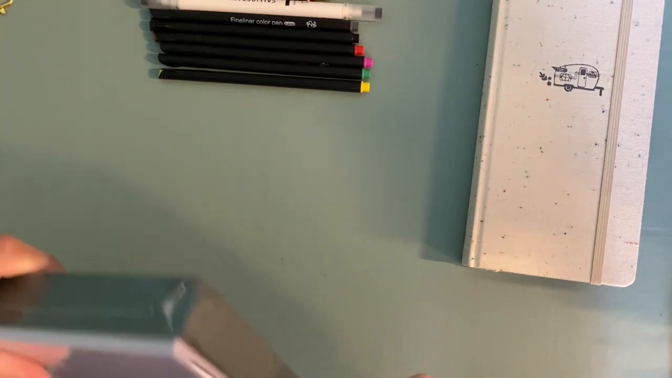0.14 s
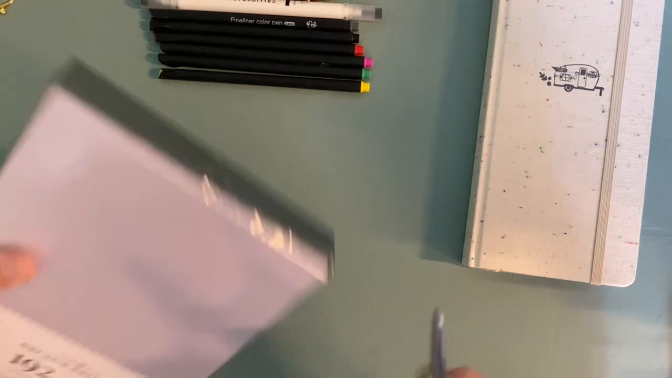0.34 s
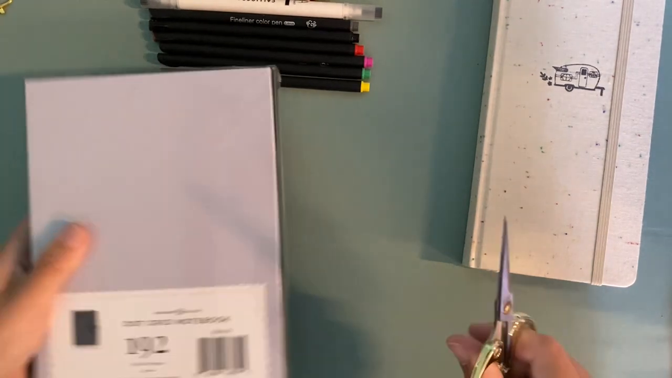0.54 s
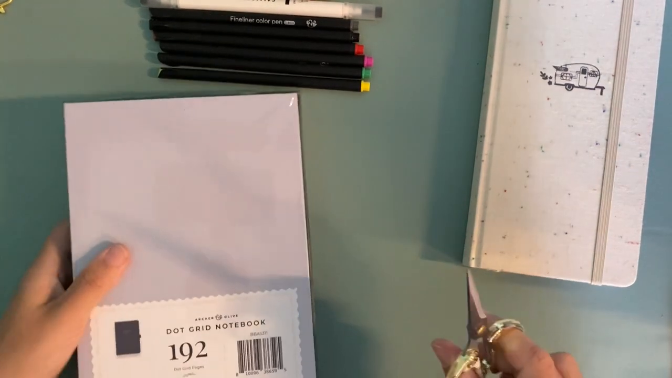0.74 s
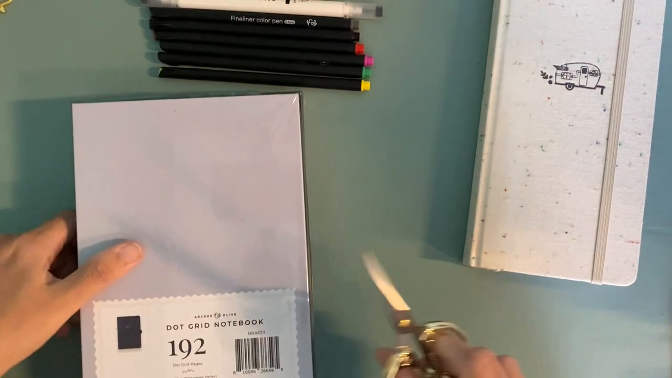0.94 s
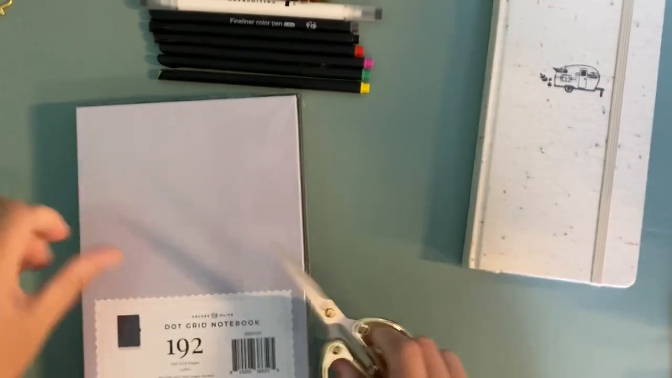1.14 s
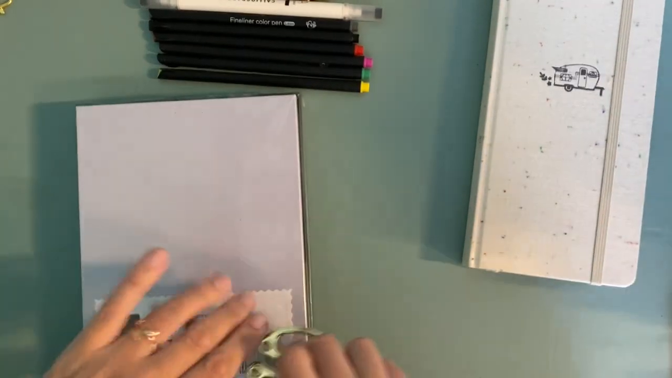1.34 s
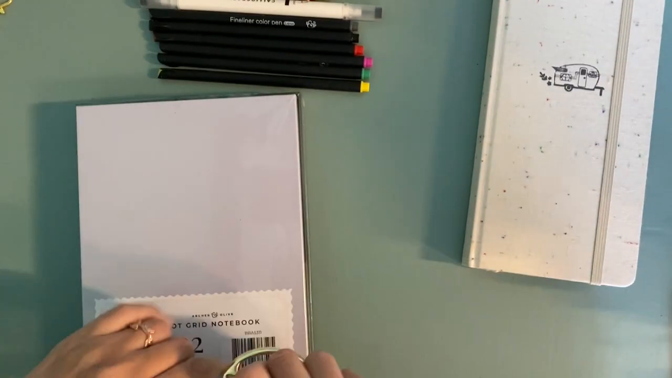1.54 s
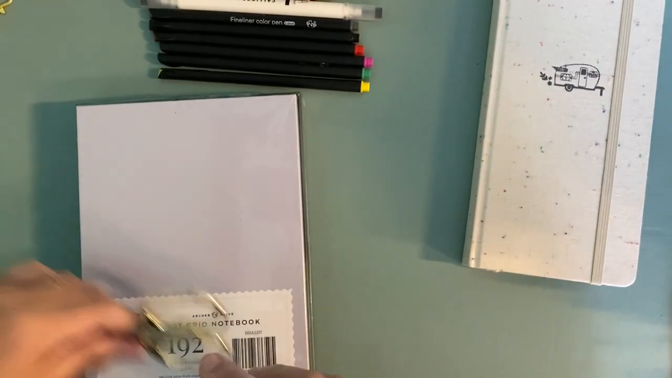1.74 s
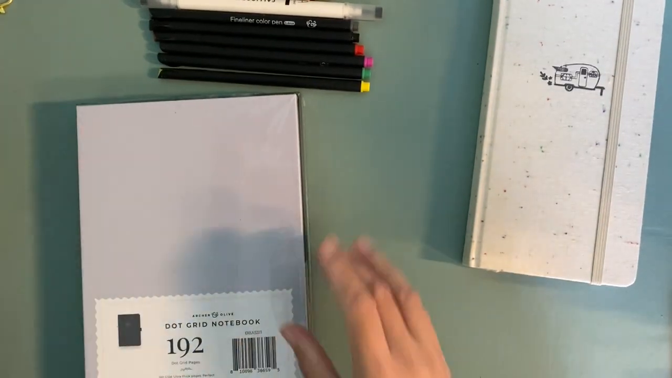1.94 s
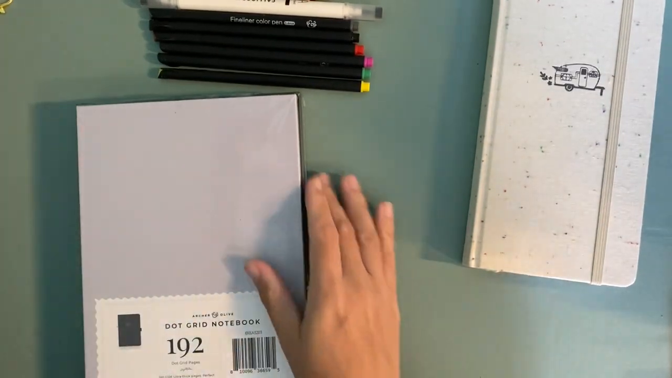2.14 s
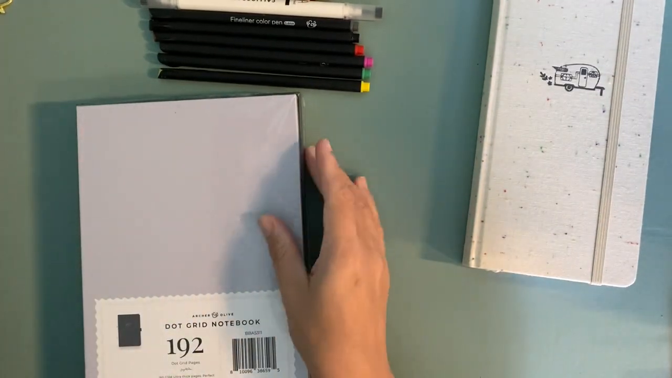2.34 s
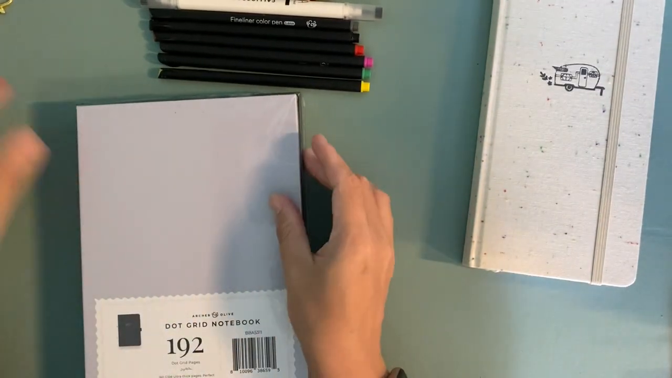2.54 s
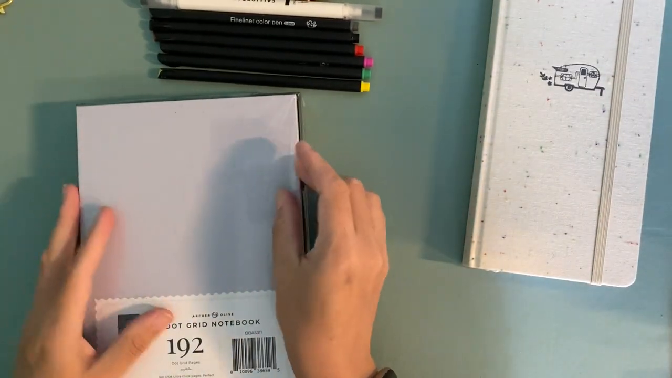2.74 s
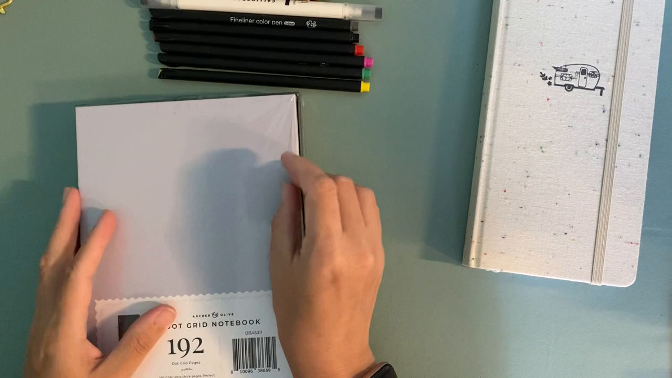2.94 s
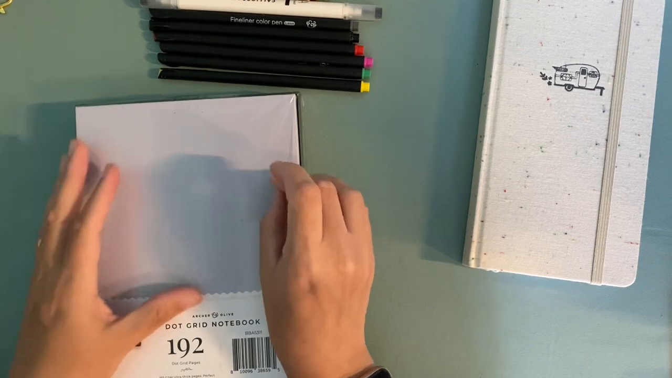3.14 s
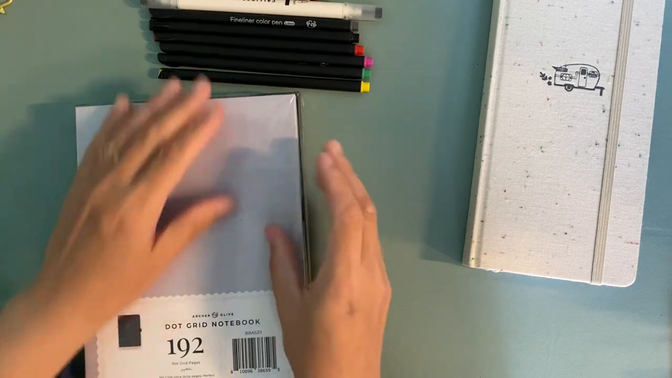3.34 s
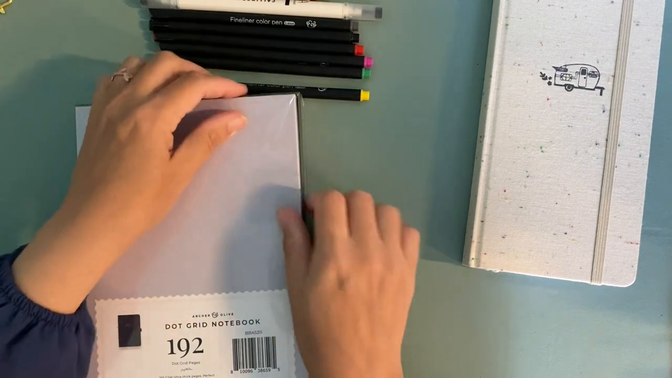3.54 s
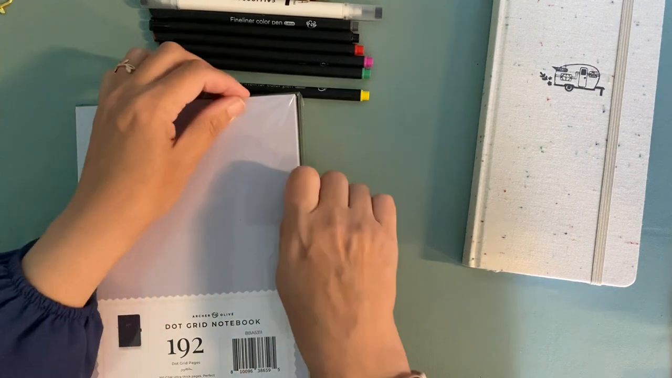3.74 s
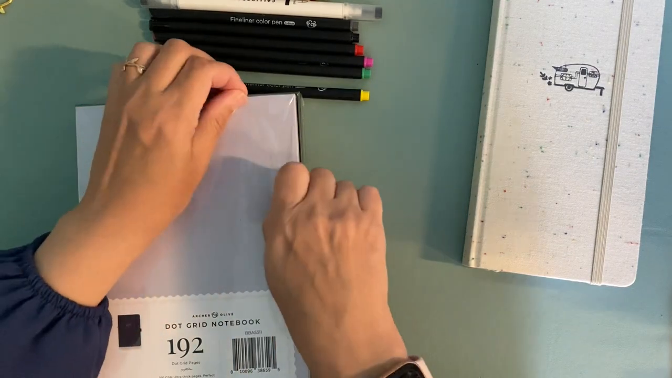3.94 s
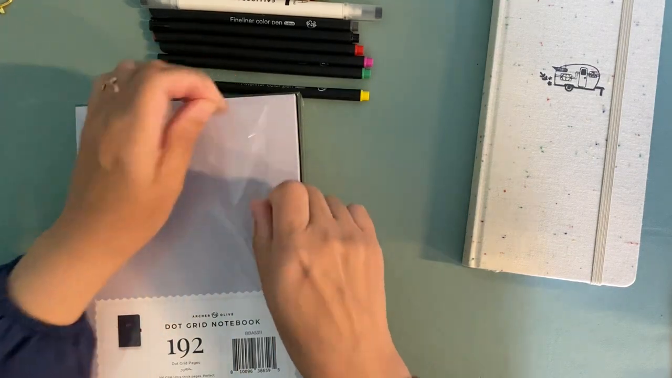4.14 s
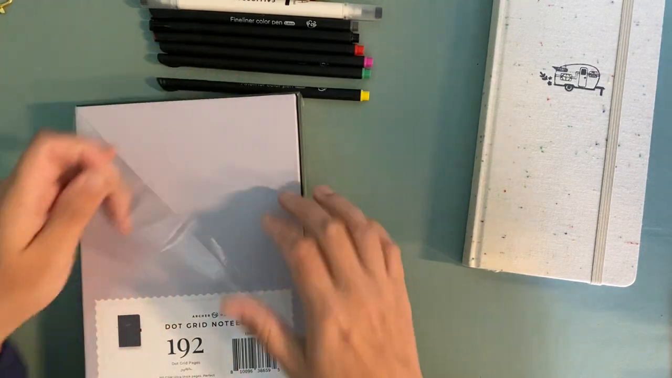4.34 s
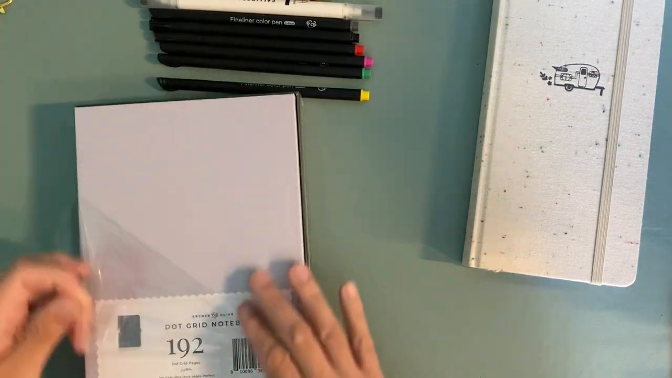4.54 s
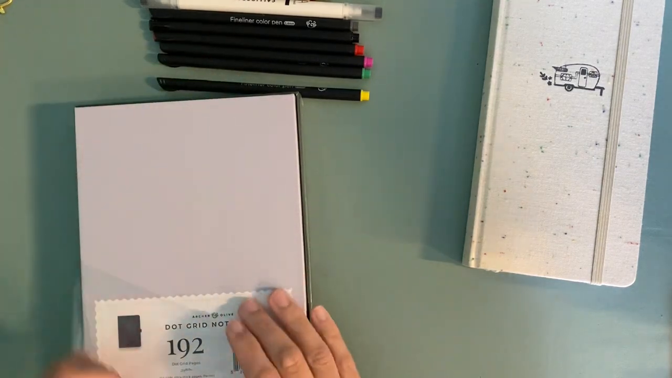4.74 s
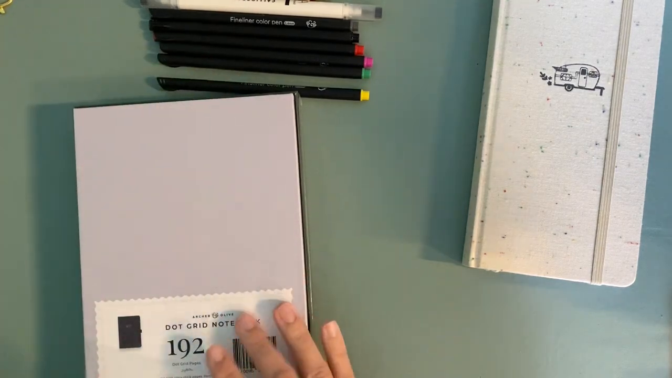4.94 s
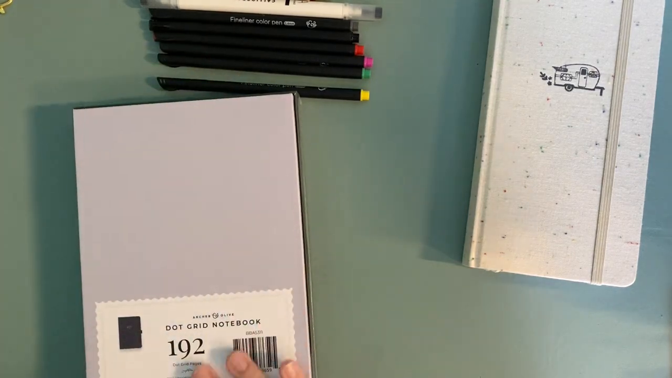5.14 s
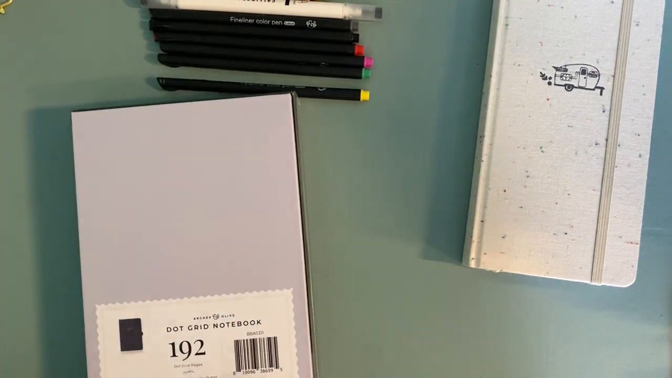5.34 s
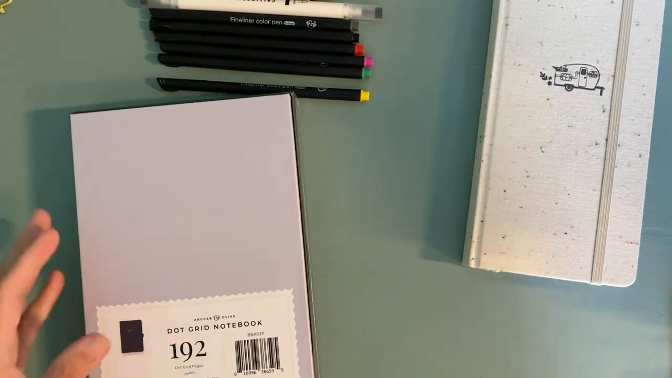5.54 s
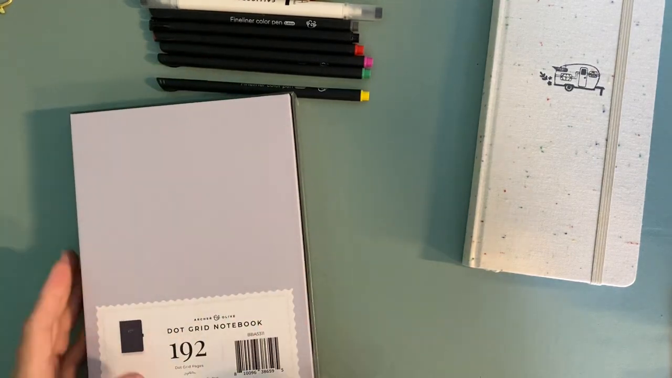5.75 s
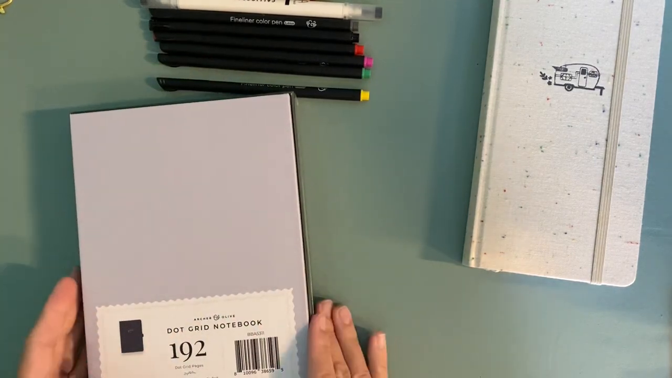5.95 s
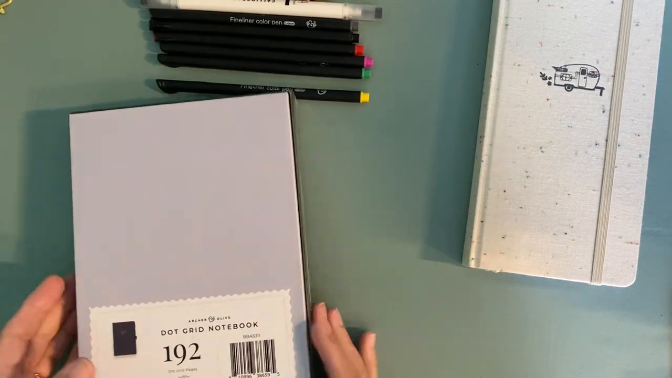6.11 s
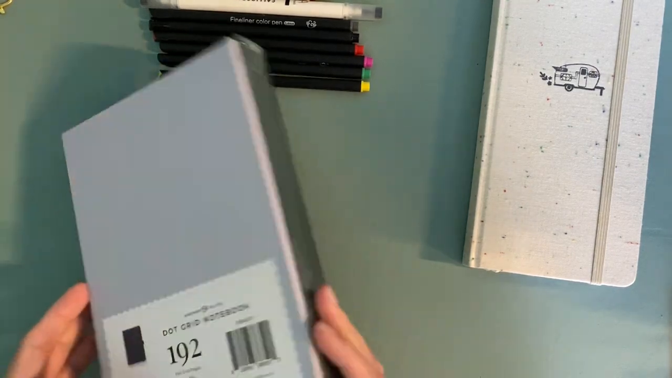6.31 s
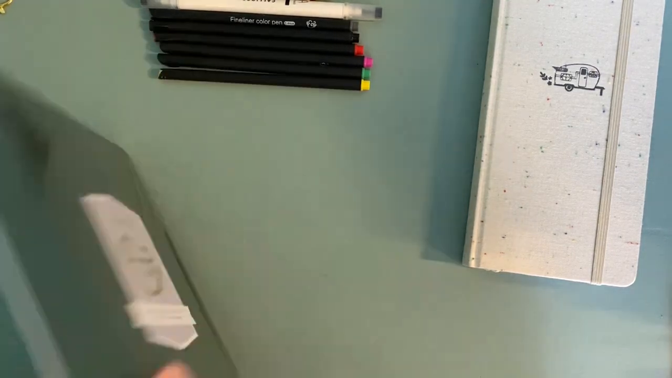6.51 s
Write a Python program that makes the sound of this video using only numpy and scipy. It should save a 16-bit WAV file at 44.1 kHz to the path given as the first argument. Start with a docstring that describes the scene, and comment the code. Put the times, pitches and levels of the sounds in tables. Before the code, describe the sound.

A wrapped hardcover book thuds softly onto a desk, scissors clatter down with ringing steel, then plastic film crackles sharply as it is peeled off.

```python
"""A shrink-wrapped hardcover notebook is laid on a desk: its landings ring the desk top and slap the air.
Its slit film is picked at and peeled off: creases snap and ring small patches, strokes hiss and crackle.
Scissors are put down beside it in a double clatter of knocks, clinks and ringing steel; pens rattle briefly.
At the end fingers slide over the book and lift it. The microphone's stand sways and trembles with the desk,
and the quiet room adds air noise and the narrow hum of ventilation."""
import sys
import numpy as np
from scipy import signal
from scipy.fft import rfft, irfft
from scipy.io import wavfile

SR = 44100
rng = np.random.default_rng(int(sys.argv[2]) if len(sys.argv) > 2 else 0)


def output_pcm(signal):
    """Save a mono or channel-first signal as 16-bit PCM at the path in sys.argv[1].

    Samples are clipped to [-1, 1] before scaling.
    """
    pcm = np.clip(np.atleast_2d(signal).T, -1, 1) * 32767
    wavfile.write(sys.argv[1], SR, np.round(pcm).astype(np.int16))


N = 290045
TIME = np.arange(N) / SR  # s

# colour of snapping film: (frequency [Hz], density [dB per Hz])
FILM_COLOUR = [(350, -32), (850, 4), (1300, -5), (1800, -4), (3000, -7.5), (4600, -1.5), (6900, -5),
               (8600, -2), (11000, -9), (13200, -7), (16000, -18)]
SNAP_T60 = 0.018  # s, decay of a snap's tick


def amp(db):
    """Decibels to gain."""
    return 10 ** (np.asarray(db) / 20)


def evened(x):
    """Scales to rms 1."""
    return x / np.sqrt(np.mean(x ** 2) + 1e-30)


def unit(x):
    """Scales to energy 1."""
    return x / np.sqrt(np.sum(x ** 2) + 1e-30)


def read(points, hz):
    """Reads a table along a log-frequency axis."""
    f, value = np.transpose(points)
    return np.interp(np.log(hz + 1), np.log(f + 1), value)


def add(mix, s, sound):
    """Lays a sound into the mix at time s."""
    part = mix[max(round(s * SR), 0):][:len(sound)]
    part += sound[:len(part)]


def colour(x, spectrum, size=4096):
    """Causal minimum-phase filter with the given spectrum: attacks stay sharp."""
    hz = abs(np.fft.fftfreq(size, 1 / SR))
    log_gain = np.log(amp(np.maximum(read(spectrum, hz), -100)))
    minimum_phase = np.exp(np.conj(signal.hilbert(log_gain)))
    taps = np.fft.ifft(minimum_phase).real[:size // 2]
    return signal.fftconvolve(x, unit(taps))[:len(x)]


def noise(gain):
    """Steady noise of rms 1 whose magnitude is the function gain(Hz)."""
    spectrum = rfft(rng.standard_normal(N))
    return evened(irfft(spectrum * gain(np.fft.rfftfreq(N, 1 / SR)), N))


def fade(t60, size=44100):
    """Exponential decay, 60 dB down after t60."""
    return np.exp(-np.log(1000) * np.arange(size) / SR / max(t60, 1 / 1000))


def ring(modes, scatter=0):
    """The dying sines of a struck object; scatter (in turns) starts them out of step."""
    t = TIME[:SR]
    out = 0
    for hz, db, t60 in modes:
        phase = hz * t + scatter * rng.random()
        out = out + amp(db) * fade(t60) * np.sin(2 * np.pi * phase)
    return out


def crack(spectrum, hz, t60, focus_db, size=4096):
    """A burst of energy 1 in a material's colour, leaning towards hz."""
    hump = [(hz / 4, -focus_db), (hz / 2, -focus_db / 2), (hz, 0), (hz * 2, -focus_db)]
    burst = rng.standard_normal(size) * fade(t60, size=size)
    return unit(colour(colour(burst, spectrum), hump))


def room(x, wet_db, echo_db, echo_s=0.0091):
    """One distinct reflection and a diffuse tail that swells, then decays at a rate set by frequency."""
    # reverberation: (frequency [Hz], t60 [s])
    tail_decay = [(100, 0.42), (500, 0.72), (3000, 0.38), (8000, 0.34), (16000, 0.27)]
    hz, t, z = signal.stft(rng.standard_normal(SR), SR, nperseg=256)
    decay = np.exp(-np.log(1000) * t / read(tail_decay, hz)[:, None])
    tail = signal.istft(z * decay, SR, nperseg=256)[1][:SR]
    response = amp(wet_db) * unit(tail * (1 - fade(0.032)))
    echo = unit(rng.standard_normal(SR) * fade(0.018))
    add(response, echo_s, amp(echo_db) * echo)
    response[0] += 1  # the direct sound
    return signal.fftconvolve(x, response)[:N]


def ambience():
    """Room air with the narrow, wavering hum of ventilation: noise confined around each centre."""
    # colour of the air: (frequency [Hz], density [dB per Hz])
    air_colour = [(32, -29), (55, -6.5), (80, -4), (97, -16.5), (129, -2.5), (156, -15.5), (223, -14),
                  (297, -16), (376, -9.5), (414, -18.5), (512, -19), (697, -19), (2030, -29.5), (5370, -49),
                  (16000, -61)]
    # ventilation: (frequency [Hz], width [Hz], level [dB])
    hum_bands = [(73.5, 4.7, -66.5), (116.8, 13, -64.5), (129, 2.53, -63.5), (377.5, 4.5, -70.5),
                 (517.1, 9.3, -73), (648, 7.4, -75.5), (914.5, 7.6, -81.5)]
    hum = np.zeros(N)
    for centre, width, db in hum_bands:
        hum += amp(db) * noise(lambda hz: 1 / (1 + ((hz - centre) / width) ** 2))
    return hum + amp(-59) * noise(lambda hz: amp(read(air_colour, hz)))


def stand():
    """Deep tremor that travels from the desk up the microphone stand, and two jolts that set it swaying."""
    # tremor, strongest after the landing and as the film is pulled: (time [s], level [dB])
    tremor_level = [(.56, -55.5), (.7, -38), (1.1, -31), (1.4, -36), (1.7, -43), (2.5, -47), (2.85, -43),
                    (3.75, -44), (4.05, -34), (4.5, -38.5), (5.7, -40.5), (6.58, -38.5)]
    # colour of the tremor: (frequency [Hz], density [dB per Hz])
    tremor_colour = [(5, -0.5), (11, 5), (22, -2), (35, -16), (50, -20), (80, -32), (160, -103)]
    # jolts to the stand: (time [s], level [dB])
    jolts = [(0.67, -16.5), (1.04, -13.5)]
    # resonances of the stand: (frequency [Hz], level [dB], t60 [s])
    stand_modes = [(24.2, -1, 0.53), (30.1, -8, 0.5)]
    swell = amp(np.interp(TIME, *np.transpose(tremor_level)))
    out = swell * noise(lambda hz: amp(read(tremor_colour, hz)))
    for s, db in jolts:
        add(out, s, amp(db) * ring(stand_modes) * (1 - fade(0.13)))
    return out


def effort(resting_db=-88.5, release_t60=0.36):
    """Each stroke speeds up at its own pace, holds and dies away: gains of the rub and of its treble."""
    # film and fingers over the cover, loudest as the wrap is drawn off:
    # (start [s], length [s], level [dB], treble over the rest [dB], rise [s])
    strokes = [(0.1, 0.063, -83, 2, 0.032), (0.725, 0.13, -74.5, 2, .04), (2.474, 0.27, -78.5, 2, 0.042),
               (2.944, 0.54, -80.5, 8.5, 0.027), (3.556, 0.4, -78.5, 6.5, 0.031),
               (4.154, 0.36, -72, -1, 0.02), (4.35, 0.081, -57.5, -7, .025), (4.474, 0.39, -63.5, 6, .025),
               (4.652, 0.33, -64, 9, 0.1), (4.942, 0.16, -60, 7, 0.06), (5.13, 0.093, -65, 11.5, 0.031),
               (5.195, 0.12, -57.5, 3, 0.036), (5.38, 0.19, -60.5, 7, 0.11), (5.59, 0.15, -73, 0, .025),
               (5.762, 0.19, -75, 0, 0.038), (6.047, 0.3, -70.5, -1, 0.05), (6.373, 0.083, -63.5, 2, 0.045),
               (6.48, 0.078, -65.5, -2, 0.03)]
    power = np.zeros((2, N)) + amp(resting_db) ** 2  # the hands never lie quite still on the film
    for start, length, db, top_db, rise_s in strokes:
        rise = np.clip((TIME - start) / max(rise_s, .01), 0, 1)
        since_end = np.maximum(TIME - start - length, 0)
        release = np.exp(-np.log(1000) * since_end / release_t60)
        power += (amp([[db], [db + top_db]]) * rise * release) ** 2
    return np.sqrt(power)


def sliding(speed, top_speed, grains_per_s=240, spread_db=5):
    """Friction hiss and tiny crackles, both following the speed of the stroke."""
    # colour of the rub: (frequency [Hz], density [dB per Hz])
    rub_colour = [(880, -6), (1500, -5.5), (1690, 2), (1850, -7.5), (2640, -3.5), (3000, -1.5),
                  (4420, -2.5), (5330, 1), (6430, -1.5), (6960, -4.5), (8660, -5), (9560, -8.5),
                  (14200, -12.5), (15200, -20), (16000, -10)]
    grain_gain = amp(spread_db * np.minimum(rng.exponential(1, N), 3))
    grains = grain_gain * (rng.random(N) < grains_per_s / SR)
    pitches = np.geomspace(3000, 14000, num=32)  # Hz
    choice = rng.integers(0, len(pitches), N)
    crackle = np.zeros(N)
    for k, hz in enumerate(pitches):
        grain = crack(rub_colour, hz, 0.0046, focus_db=5.0)
        crackle += signal.oaconvolve(grains * (choice == k), grain)[:N]
    grip = amp(2.33 * noise(lambda hz: 1 / (1 + (hz / 50) ** 2)))  # the film catches and lets go
    hiss = noise(lambda hz: amp(read(rub_colour, hz)))
    rub = grip * (amp(-4.0) * hiss + amp(-10) * evened(crackle))
    highpass = signal.butter(2, 9500, "high", fs=SR, output="sos")
    top = signal.sosfiltfilt(highpass, rub)
    return speed * (rub - top) + top_speed * top  # taut film hisses brighter


def creases(speed, count=160, per_s=19):
    """Small creases give way at random moments, their level following the stroke's speed."""
    peak_db, scatter_db = 15.5, 3  # highest level over the stroke's; half the range below it
    centre_hz, octaves, focus_db = 6500, 1, 12  # pitch, its scatter either way, narrowness
    out = np.zeros(N)
    for place, chance, size, pitch in rng.random((count, 4)):
        at = int(place * N)
        hz = centre_hz * 2 ** (octaves * (2 * pitch - 1))
        snap = crack(FILM_COLOUR, hz, SNAP_T60, focus_db)
        if chance < per_s * N / SR / count:
            level = amp(peak_db + scatter_db * (2 * size - 2.0))
            add(out, at / SR, speed[at] * level * snap)
    return out


def snaps(focus_db=3, patch_t60=0.0047):
    """A large crease buckles with a broad tick, and its patch of film rings for a few milliseconds."""
    # creases snapping through: (time [s], tick level [dB], pitch [Hz], ring of the patch [dB])
    large_creases = [(0.126, -43, 8600, -48), (0.131, -37, 7800, -51), (0.372, -35.5, 11900, -53),
                     (0.744, -52, 7900, -63), (3.0, -45, 5620, -55), (3.027, -50, 8500, -48),
                     (3.14, -36.5, 7400, -55), (3.32, -48, 9100, -56), (3.432, -41.5, 4740, -56),
                     (3.989, -42.5, 6000, -60), (3.997, -40.5, 5460, -50), (4.008, -45, 11000, -55),
                     (4.025, -33, 6940, -50), (4.096, -40.5, 3930, -44), (4.145, -49, 3770, -47),
                     (4.18, -40.5, 9000, -52), (4.259, -42, 4960, -37), (4.281, -31, 6000, -38),
                     (4.286, -35, 11000, -48), (4.342, -38, 11000, -48), (4.3677, -16, 4150, -23.5),
                     (4.3686, -27, 4900, -25.5), (4.452, -32, 5400, -37), (4.492, -27, 4900, -24),
                     (4.493, -28.5, 8600, -23.5), (4.526, -34, 4900, -35), (4.702, -39, 3750, -28),
                     (4.7032, -31, 5000, -27.5), (4.779, -34, 5740, -41), (4.851, -41, 4410, -37),
                     (4.877, -46, 11900, -41), (5.013, -36, 7000, -37), (5.045, -32, 5630, -38),
                     (5.0544, -33.5, 5640, -39), (5.127, -33, 7860, -40), (5.152, -45, 4850, -47),
                     (5.169, -47, 6600, -38), (5.185, -42, 6000, -43), (5.285, -41, 5300, -43),
                     (5.297, -39, 3800, -35), (5.309, -28, 5600, -25.5), (5.404, -33.5, 8950, -35),
                     (5.423, -36, 3100, -41), (5.433, -44, 1640, -35), (5.439, -37, 4900, -35.5),
                     (5.5498, -29, 8500, -26), (5.5517, -34, 3050, -29.5), (5.561, -40, 7400, -35),
                     (5.5613, -45, 2770, -36), (5.5945, -38, 2900, -46), (5.672, -43, 6550, -40.5),
                     (5.72, -43.5, 12000, -48), (6.066, -43, 6800, -55), (6.131, -42, 5640, -40),
                     (6.148, -38, 6400, -41), (6.21, -54, 4180, -46), (6.227, -40, 3920, -43),
                     (6.236, -52, 4050, -41), (6.288, -43, 9000, -51), (6.299, -42, 6500, -48),
                     (6.388, -41, 9000, -54), (6.446, -46, 6500, -43)]
    ticks, patches = np.zeros((2, N))
    for s, tick_db, hz, ring_db in large_creases:
        add(ticks, s, amp(tick_db) * crack(FILM_COLOUR, hz, SNAP_T60, focus_db))
        add(patches, s, amp(ring_db) * unit(ring([(hz, 0, patch_t60)])))
    return ticks, patches


def scissors(contact_t60=0.015, knock_t60=0.034, ping_t60=0.017, count=3):
    """A chatter of hard contacts: each knocks the desk, clinks, rebounds and rings the steel by where it hits."""
    # blades land first, handles after: (time [s], contact level [dB], contact pitch [Hz],
    # knock on the desk [dB], ping [dB], blades 0 or handles 1)
    clatter = [(2.165, -15.5, 4570, -28, -19.5, 0), (2.1714, -21.5, 2700, -27.5, -24, 0),
               (2.175, -26, 6500, -36, -27, 0), (2.1811, -19, 5530, -20.5, -18, 0),
               (2.1886, -12.5, 4570, -32, -18, 0), (2.1907, -26, 3000, -40, -16, 0),
               (2.1976, -15.5, 5720, -40, -22, 0), (2.2018, -17.5, 4050, -38, -23, 0),
               (2.2116, -26, 5600, -46, -31, 0), (2.2127, -36, 3000, -38, -22, 0),
               (2.223, -25, 2930, -36, -35, 0), (2.229, -37, 4800, -48, -35, 0),
               (2.2637, -27, 5000, -47, -44, 0), (2.3434, -10, 5660, -53, -17, 1),
               (2.346, -22, 8230, -50, -26, 1), (2.352, -16, 3950, -45, -19.5, 1),
               (2.357, -28, 3173, -44, -16, 1), (2.4131, -34, 1640, -29.5, -31, 1)]
    # blades and finger loops: (frequency [Hz], struck on blades [dB], struck on handles [dB], t60 [s])
    steel = [(2232, -13, -10, .25), (2336, -11, -12, .25), (2548, -9, -4, .22), (2592, -7, -9, .19),
             (2676, -9, -3, .35), (2705, -3, -12, .18), (2802, -7, -16, .24), (2895, -4, -14, .18),
             (2986, 3, -10, .22), (3048, -12, -2, .18), (3140, -3, 4, .2), (3235, -9, 0, .22),
             (3567, -12, -5, .16), (3741, -7, -9, .2), (4016, -5, -5, .2), (4083, -7, -6, .17),
             (4301, -10, -4, .16), (4395, -6, -7, .15), (4458, -1, -8, .16), (4501, 0, -6, .16),
             (4680, -4, -3, .18), (4748, -4, -6, .16), (4915, -9, -6, .13), (5167, -11, -8, .16),
             (5398, -11, -2, .17), (5523, -7, -11, .15), (5587, -7, -12, .15), (6194, -6, -12, .19),
             (6274, -6, -10, .16), (6721, -10, -8, .17), (6799, -10, -4, .28), (6960, -6, -5, .18),
             (7300, -16, -7, .22), (7800, -14, -12, .19), (8175, -10, -11, .2), (8243, -12, -6, .18),
             (8310, -11, -9, .18), (9862, -6, -14, .18), (10030, -10, -14, .12), (10200, -10, -14, .16),
             (10350, -11, -15, .16), (12600, -16, -15, .1), (14650, -13, -12, .06)]
    # colour of the contacts: (frequency [Hz], density [dB per Hz])
    clink_colour = [(300, -18), (1200, -25), (2350, -6), (2750, -1.5), (3700, -11), (4500, -2.5),
                    (5600, -10.5), (7300, -10.5), (8300, -10.5), (9000, -14.5), (10000, -8), (11000, -20),
                    (12600, -15), (15000, -19)]
    # colour of the desk under the scissors: (frequency [Hz], density [dB per Hz])
    knock_colour = [(80, 6), (200, 2), (350, 0.5), (600, -6), (850, -3), (1500, -8), (4000, -46)]
    # one blade comes free as they settle and sings on: (time [s], level [dB], frequency [Hz], t60 [s])
    last_ring = (2.476, -56, 2676, .31)
    # tiny metallic tink: (frequency [Hz], level [dB], t60 [s])
    tink_modes = [(7800, -7, 0.21), (8050, -12, .2), (14700, -3, .17), (15150, -1, 0.14), (15600, -2, .15)]
    clink_db, steel_db = -1, -6  # shares of the contact noise and of the ringing steel
    rebound_s, rebound_db = .004, -6  # gap between bounces, and level change at each
    out = np.zeros(N)
    for s, db, hz, knock_db, ping_db, on_handles in clatter:
        modes = []
        for f, blade_db, handle_db, t60 in steel:
            modes.append((f, handle_db if on_handles > .5 else blade_db, t60))
        add(out, s, amp(db + steel_db) * unit(ring(modes, scatter=0.89)))
        add(out, s, amp(ping_db) * unit(ring([(hz, 0, ping_t60)])))  # the spot that is hit
        add(out, s, amp(knock_db) * crack(knock_colour, 360, knock_t60, focus_db=6.5))
        for bounce in range(count):
            level = amp(db + clink_db + bounce * rebound_db)
            clink = crack(clink_colour, hz, contact_t60, focus_db=4.5)
            add(out, s + bounce * rebound_s, level * clink)
    s, db, hz, t60 = last_ring
    add(out, s, ring([(hz, db, t60)]) * (1 - fade(0.039)))
    add(out, 0.372, amp(-41) * unit(ring(tink_modes)))  # the hand finds the scissors
    return out


def book(landing_s=0.016):
    """Each landing rings the desk top, felt through the stand, and slaps air into the room."""
    # the book meets the desk edge first, then flat, settling each time; later a hand nudges it:
    # (time [s], thud level [dB], slap level [dB], slap t60 [s])
    thumps = [(0.636, -41, -41, 0.12), (0.652, -36, -45, 0.091), (0.676, -41, -53, 0.093),
              (0.996, -23, -46.5, 0.45), (1.006, -34, -46, 0.16), (1.022, -34, -53, 0.15),
              (5.834, -49, -67, 0.074)]
    # desk top: (frequency [Hz], level [dB], t60 [s])
    desk_modes = [(80, -1, .14), (94, -1, .12), (108, 1, .15), (128, -16, .35), (177, -8, .15),
                  (280, -13, .16), (385, -22, .17), (544, -22, .17), (650, -26, .15), (910, -33, .11)]
    # colour of cover on desk: (frequency [Hz], density [dB per Hz])
    slap_colour = [(120, -10.5), (220, -7.5), (400, -8.5), (600, -16), (900, -23), (1400, -24.5),
                   (2200, -33.5), (3400, -34.5), (5500, -41), (14000, -57)]
    thud, slap = np.zeros((2, N))
    press = 1 - fade(landing_s)  # the cover builds force over a few milliseconds
    for s, thud_db, slap_db, t60 in thumps:
        add(thud, s, amp(thud_db) * ring(desk_modes) * press)
        burst = rng.standard_normal(SR) * fade(t60) * press
        add(slap, s, amp(slap_db) * colour(burst, slap_colour))
    return thud + room(slap, wet_db=-11.0, echo_db=-21)


def pens():
    """Plastic barrels, jostled by the book's first landing, rattle briefly against each other."""
    # jostles: (time [s], level [dB])
    jostles = [(0.6385, -34.5), (0.65, -42)]
    # plastic barrels: (frequency [Hz], level [dB], t60 [s])
    barrel_modes = [(720, 1, .04), (900, 0, 0.044), (2410, -9, .05), (3050, -1, .1), (3180, -2.5, .1),
                    (3400, -9, .08), (3700, -8, 0.1), (3880, -4, 0.11), (5000, -13, 0.069)]
    out = np.zeros(N)
    for s, db in jostles:
        add(out, s, amp(db) * unit(ring(barrel_modes, scatter=0.8)))
    return out


def scene():
    """The film is handled close by; scissors and pens sound wetter, with a late echo off a wall."""
    speed, top_speed = effort()
    ticks, patches = snaps()
    facing = room(patches, wet_db=-13, echo_db=-10)  # patches face the microphone: a fainter tail
    film = ticks + creases(speed) + sliding(speed, top_speed)
    near = room(film, wet_db=-8.0, echo_db=-12.0)
    far = room(scissors() + pens(), wet_db=-6.0, echo_db=-19.5, echo_s=0.067)
    return (near + facing + far + book() + stand() + ambience())[None]


def record(dry):
    """The recorder's band limit: a steep low-pass at 15850 Hz."""
    lowpass = signal.firwin(511, 15850, window=("kaiser", 9), fs=SR)
    return signal.oaconvolve(dry, lowpass[None], "same")


dry = scene()
out = record(dry)
output_pcm(out)
```